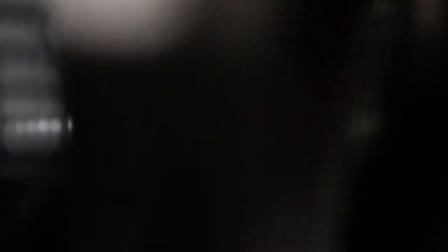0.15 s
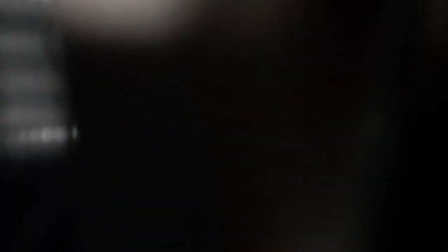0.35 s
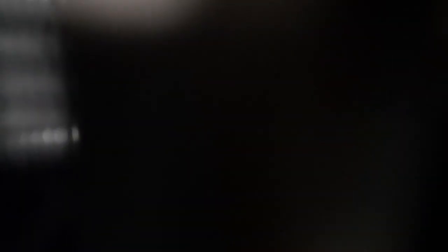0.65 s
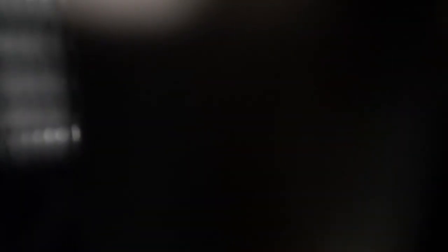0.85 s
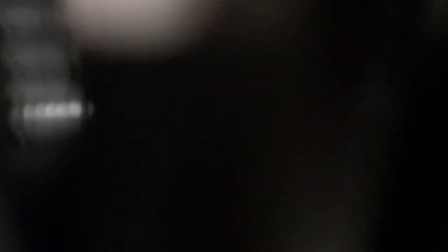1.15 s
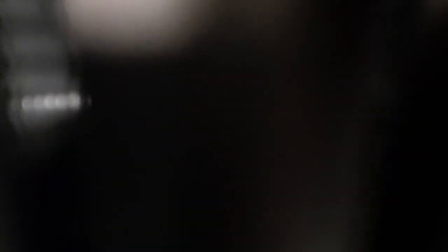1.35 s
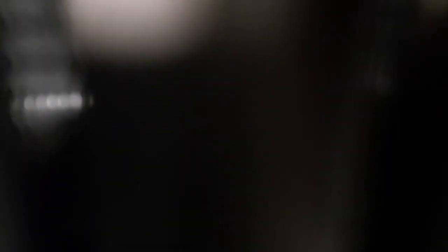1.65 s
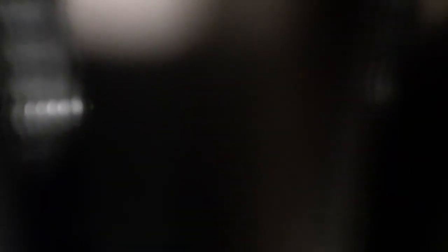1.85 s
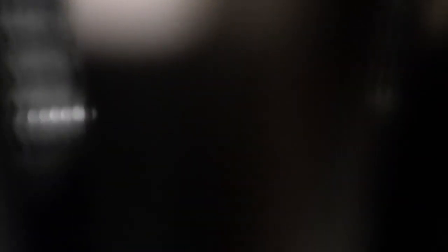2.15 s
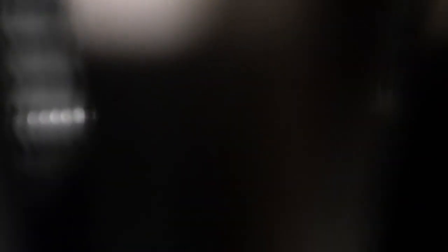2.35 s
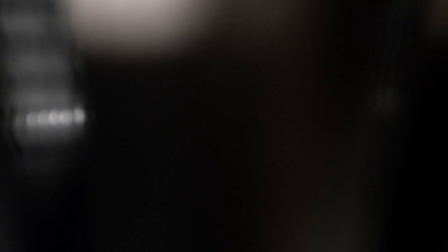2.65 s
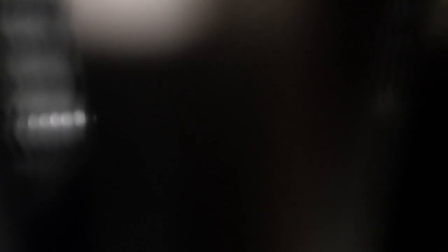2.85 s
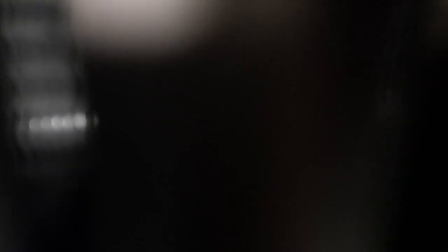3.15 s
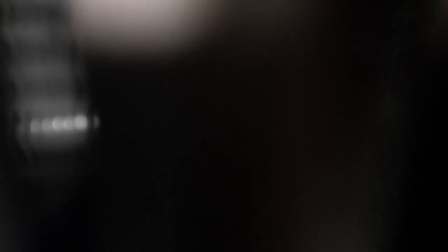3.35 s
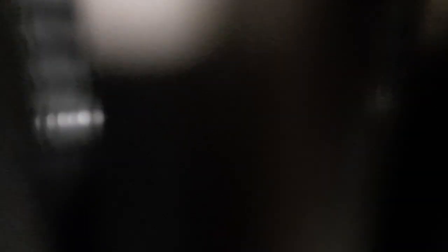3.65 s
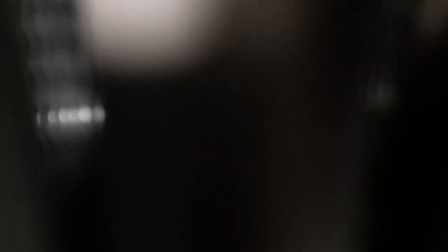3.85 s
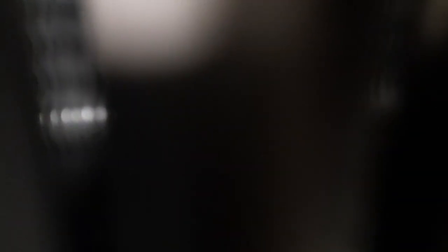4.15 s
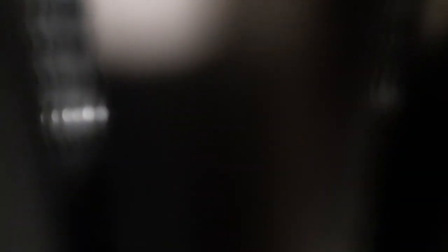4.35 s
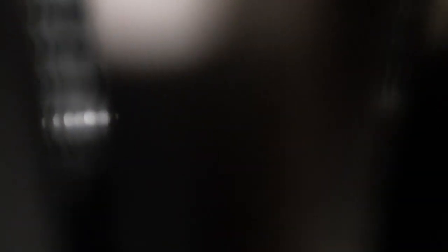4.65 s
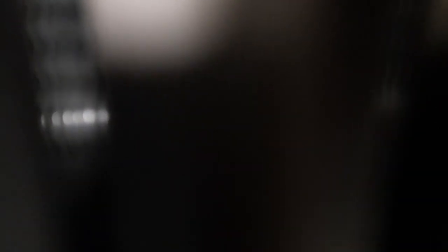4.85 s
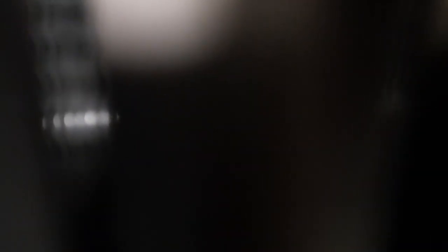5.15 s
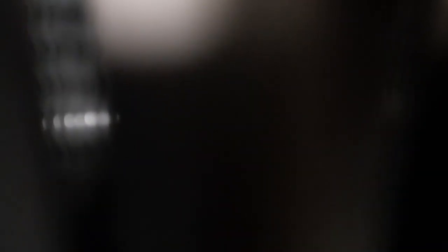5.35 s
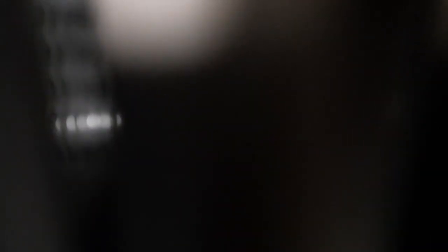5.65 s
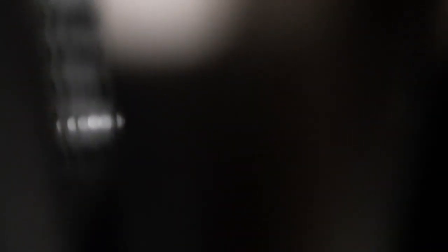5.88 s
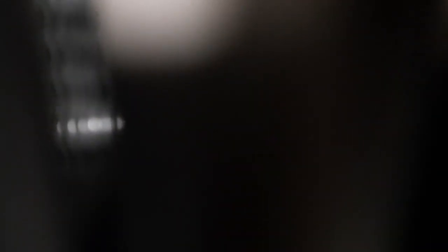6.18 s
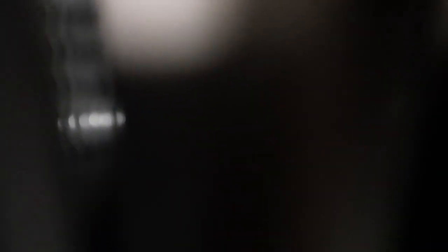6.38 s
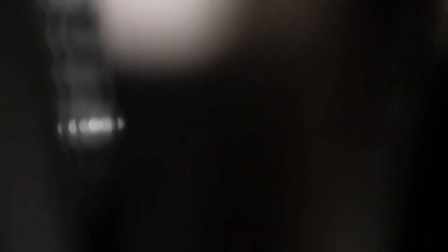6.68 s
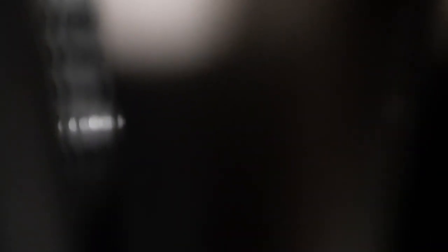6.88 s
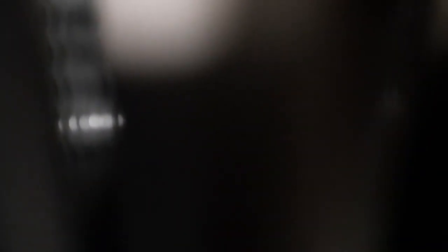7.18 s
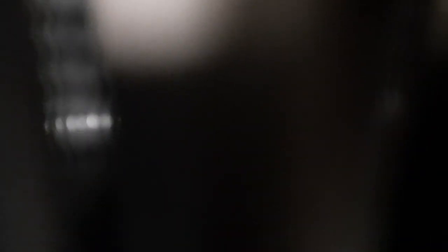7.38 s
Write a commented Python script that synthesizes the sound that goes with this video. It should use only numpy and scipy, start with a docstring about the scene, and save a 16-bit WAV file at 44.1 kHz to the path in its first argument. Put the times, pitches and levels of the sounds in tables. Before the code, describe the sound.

A window air conditioner is heard close up in a garage, slightly to the left. It opens with a faint low hum, soft gurgling and a thin hiss. At about 0.5 seconds the switch snaps off with one loud clunk and a quick, smaller rebound. The sheet-metal case rings with a low, hollow tone, and this dies away with a short room echo by about 1 second. Everything afterwards is much quieter. The rotor throbs low and unevenly, swelling slightly near 2 seconds, fading from about 5 to 7 seconds and returning a little at the end. Refrigerant gurgles in the coil and hisses through the tubes throughout, with tiny high spits at irregular moments, clearest near 2.6, 4.2 and 5.1 seconds. The flow eases slightly after 6.4 seconds and is still going at about 7.5 seconds.

```python
"""One clunk switches off a window air conditioner in a garage and rings its sheet-metal case.
A slow rotor throbs on and fades, its low shaft orders beating together. Refrigerant keeps gurgling
in the coil and hissing through the tubes, with small spits as bubbles pass the capillary.
The microphone is close, the unit a little to its left."""
import sys
import numpy as np
from scipy import signal
from scipy.fft import rfft, irfft
from scipy.io import wavfile

SR = 44100
rng = np.random.default_rng(int(sys.argv[2]) if len(sys.argv) > 2 else 0)


def dump_mix(stems):
    """Bounce the given channels to the path in sys.argv[1] as a 16-bit WAV at rate SR."""
    frames = np.atleast_2d(stems).T  # one column per channel
    limited = np.clip(frames, -1, 1)  # hard clip at full scale
    pcm = np.round(limited * 32767).astype(np.int16)
    wavfile.write(sys.argv[1], SR, pcm)


N = 331632
TIME_S, FREQ_HZ = np.arange(N) / SR, np.fft.rfftfreq(N, 1 / SR)


def amp(db):
    """Decibels to gain."""
    return 10 ** (np.asarray(db) / 20)


def unit_rms(x):
    """Scale to rms 1."""
    return x / np.sqrt(np.mean(x ** 2) + 1e-30)


def at_freq(curve, hz=FREQ_HZ):
    """Interpolate a curve on a log-frequency axis."""
    knots_hz, values = np.transpose(curve)
    return np.interp(np.log(hz + 1), np.log(knots_hz + 1), values)


def at_time(rows, column):
    """Interpolate one column at every sample."""
    rows = np.array(rows)
    return np.interp(TIME_S, rows[:, 0], rows[:, column])


def add(mix, start_s, sound):
    """Mix in a stereo sound."""
    part = mix[:, max(round(start_s * SR), 0):][:, :sound.shape[1]]
    part += sound[:, :part.shape[1]]


def peak(hz, centre_hz, width_hz):
    """Gain of a steep-skirted resonance."""
    return 1 / (1 + (2 * (hz - centre_hz) / width_hz) ** 2)


def response(modes, bed):
    """Gain of resonances on a smooth bed, summed in power."""
    power = sum((amp(db) * peak(FREQ_HZ, hz, width_hz)) ** 2 for hz, width_hz, db in modes)
    return np.sqrt(amp(at_freq(bed)) ** 2 + power)


def wander(rate_hz):
    """Random drift of rms 1, up to about rate_hz."""
    t = np.arange(0, N / SR + 1, 1 / 500)
    hz = np.fft.rfftfreq(len(t), t[1])
    lowpass = (hz > 0) / (1 + (hz / rate_hz) ** 2)
    drift = irfft(rfft(rng.standard_normal(len(t))) * lowpass, len(t))
    return np.interp(TIME_S, t, unit_rms(drift))


def burst(spectrum, t60_curve):
    """1 s of coloured stereo noise, each band with its own decay."""
    hz, t, bands = signal.stft(rng.standard_normal((2, SR)), SR, nperseg=512)
    bands = bands * amp(at_freq(spectrum, hz))[:, None]
    decay = amp(-60 * t / at_freq(t60_curve, hz)[:, None])
    steady = signal.istft(bands, SR)[1]
    dying = signal.istft(bands * decay, SR)[1]
    return dying[:, :SR] / steady.std()


def radiate(drive, colour):
    """Colour two noise streams and spread them in stereo: alike in the bass, diffuse above."""
    # left-right likeness: freq_hz, correlation
    likeness = [(40, 1), (130, 0.94), (230, 0.52), (290, .97), (390, 0.94), (540, 0.45), (650, 0.015),
                (1400, 0.11), (3000, 0.002), (15000, 0)]
    # left over right: freq_hz, difference_db
    balance = [(60, -18), (120, 12.5), (190, 2.5), (330, 0.5), (380, -0.5), (460, 12.5), (600, 6.5),
               (850, 6.5), (1200, 0.5), (1500, 3), (2500, 0.5), (6500, 0), (8500, 5.5), (14000, 5.5)]
    common, diffuse = rfft(drive)
    correlation = np.clip(at_freq(likeness), -1, 1)
    lean_db = at_freq(balance) / 2
    left = common * amp(lean_db)
    right = (correlation * common + np.sqrt(1 - correlation ** 2) * diffuse) * amp(-lean_db)
    return unit_rms(irfft(np.array([left, right]) * colour, N))


def rotor(shaft_hz=14.32, speed_waver=0.004, flutter=0.62):
    """Low orders of a slightly unsteady shaft beat into a throb."""
    # shaft harmonics: order, gain_db
    orders = [(3, -16), (4, 1), (5, -0.5), (6, -8), (7, -1), (8, -2.5), (9, -4), (13, -15.5)]
    # throb envelope: time_s, gain_db
    throb = [(0.0, -37), (0.33, -46), (0.42, -44), (0.46, -31), (0.48, -29), (0.58, -35), (0.65, -33),
             (0.73, -45), (1.21, -42), (1.4, -42), (1.63, -42), (1.95, -33.5), (2.07, -41.5), (2.16, -40.5),
             (2.28, -43), (2.32, -47), (2.45, -44), (2.49, -44.5), (2.79, -36.5), (2.83, -41),
             (3.08, -40.5), (3.14, -45), (3.35, -38), (3.39, -42.5), (3.64, -38.5), (3.71, -45),
             (4.36, -38), (4.52, -44.5), (4.61, -43), (4.69, -46), (4.84, -40), (4.88, -47), (5.13, -47.5),
             (5.36, -44), (5.42, -50), (5.49, -44), (5.72, -45), (6.01, -57.5), (6.36, -52), (6.41, -54.5),
             (6.62, -49.5), (6.7, -66), (6.87, -49), (7.2, -48), (7.31, -44), (7.41, -46), (7.46, -41),
             (7.52, -47)]
    turns = np.cumsum(shaft_hz * (1 + speed_waver * wander(rate_hz=2.46))) / SR
    hum = 0
    for order, db in orders:
        phase = 2 * np.pi * (order * turns + rng.random())
        in_phase = (1 + flutter * wander(rate_hz=2.8)) * np.cos(phase)
        quadrature = flutter * wander(rate_hz=1.8) * np.sin(phase)
        hum = hum + amp(db) * (in_phase + quadrature)
    envelope = [row for row in throb if not 0.36 < row[0] < 0.68]  # stays low through the clunk
    return amp(at_time(envelope, 1) - 1) * unit_rms(hum)


def bubbling(pops_per_s, spread_db, pop_share):
    """Two independent streams of turbulence with bursting bubbles."""
    onsets = rng.random(N) < pops_per_s / SR
    strength = amp(spread_db * np.minimum(rng.exponential(1, N), 4))
    turbulence = rng.standard_normal((2, N))
    pops = unit_rms(onsets * strength * rng.standard_normal((2, N)))
    return np.sqrt(1 - pop_share) * turbulence + np.sqrt(pop_share) * pops


def refrigerant():
    """Bubbly flow excites the coil and case hollows, thin tubes and capillary jet; all surge together."""
    # flow envelopes: time_s, gurgle_db, tubes_db, jet_db
    flow = [
        (0, -34, -54, -51.5), (0.044, -37.5, -56.5, -59), (0.112, -40.5, -61, -61.5),
        (0.16, -35, -58, -60), (0.262, -41, -54, -57), (0.27, -41, -60, -57.5),
        (0.384, -38, -57.5, -57.5), (0.44, -35, -56, -54), (0.66, -41, -57.5, -61),
        (0.85, -41.5, -60.5, -62), (0.87, -42.5, -58, -64.5), (0.93, -43, -61, -63),
        (0.98, -36.5, -59, -64), (1.04, -41.5, -61, -59.5), (1.06, -40.5, -54.5, -63),
        (1.12, -39, -60.5, -61), (1.18, -41, -55, -58.5), (1.19, -41, -63, -61),
        (1.21, -39.5, -58.5, -62), (1.67, -41, -58.5, -62), (1.77, -41, -56.5, -64),
        (1.8, -39.5, -59, -63), (1.92, -38, -54.5, -60.5), (2, -41.5, -54, -61), (2.03, -40, -58.5, -63),
        (2.11, -43.5, -58, -62), (2.15, -39.5, -59.5, -62.5), (2.38, -39, -55.5, -61),
        (2.42, -40, -60.5, -61), (2.74, -39, -55.5, -60.5), (2.86, -43, -58, -63), (2.91, -39, -66, -61),
        (2.97, -39.5, -60, -62), (2.99, -42, -51, -62), (3.03, -39, -60, -61), (3.12, -39, -55, -60),
        (3.18, -38, -55.5, -61.5), (3.33, -40, -61, -60.5), (3.39, -38, -54, -62),
        (3.43, -41.5, -57.5, -63), (3.49, -37.5, -51, -60), (3.52, -42, -60, -62), (3.7, -37, -58.5, -62),
        (3.72, -41.5, -61.5, -63), (3.85, -38.5, -53.5, -61.5), (3.89, -37, -57, -61.5),
        (3.93, -42.5, -58, -64), (4.02, -39, -54.5, -61), (4.12, -42, -59.5, -63.5),
        (4.23, -37.5, -59.5, -59), (4.25, -40, -48.5, -59), (4.29, -41, -60, -58), (4.33, -39, -51, -64),
        (4.35, -37.5, -59, -61), (4.42, -41, -56, -61.5), (4.75, -40, -59.5, -63),
        (4.84, -42.5, -59, -61.5), (4.88, -45, -60, -61.5), (4.92, -39.5, -57, -62.5),
        (4.98, -43, -57, -62), (5.3, -40, -59, -64), (5.34, -39, -56.5, -61), (5.47, -40, -58.5, -63),
        (5.65, -43, -58.5, -63), (5.84, -39.5, -58, -64), (5.9, -41.5, -57, -62),
        (6.08, -40.5, -60, -63.5), (6.28, -43, -60.5, -62.5), (6.33, -38, -61, -59),
        (6.39, -47.5, -56, -61.5), (6.45, -49, -65, -69), (6.54, -42, -59.5, -64),
        (6.74, -43.5, -61, -66), (6.83, -41.5, -61.5, -64.5), (6.87, -49, -66, -68.5),
        (6.98, -45, -57.5, -64), (7.27, -46.5, -63, -67.5), (7.29, -42.5, -59, -64.5),
        (7.37, -41.5, -61.5, -66.5), (7.52, -41.5, -55, -63.5)]
    # resonances: centre_hz, width_hz, gain_db
    hollow_modes = [(187, 34, -11.5), (231.6, 25, -12.5), (293.8, 23.5, 1), (326.3, 35, 1), (375, 52, -1.5),
                    (428, 36, -18), (479, 47, -21.5), (555.6, 50.4, -12), (674.5, 106, -17.5),
                    (845.6, 64, -14.5)]
    tube_modes = [(1010, 61, -8), (1280, 140, -10), (1463.6, 94, 3.5), (1673, 55, -3), (2224, 84, -9.5)]
    jet_modes = [(2926, 216, 4), (3360, 300, 1.5), (3940, 220, -1.5), (4446, 320, 4), (5396, 195, 4),
                 (5810, 200, 0.5), (6254, 260, 2.5), (7600, 340, -11.5), (11300, 530, -6.5),
                 (13200, 500, -11)]
    # broadband beds under them: freq_hz, gain_db
    hollow_bed = [(30, -36), (100, -10.5), (250, -33), (600, -27.5), (900, -29), (1200, -33.5), (2000, -60)]
    tube_bed = [(500, -25), (1100, -17), (1800, -16.5), (2400, -34.5), (4000, -35)]
    jet_bed = [(800, -22), (2000, -4), (2550, -6), (3600, -4.5), (5000, -9.5), (6700, -6), (8000, -7),
               (10500, -10), (12000, -8.5), (15500, -10)]
    surge = wander(rate_hz=19)
    hollow_drive = bubbling(pops_per_s=120, spread_db=0, pop_share=0.33) * amp(0.86 * surge)
    tube_drive = bubbling(pops_per_s=200, spread_db=2, pop_share=0.24) * amp(0.93 * surge)
    jet_drive = bubbling(pops_per_s=1500, spread_db=3, pop_share=0.17)
    jet_drive *= amp(0.68 * surge + 0.91 * wander(rate_hz=55))
    gurgle = radiate(hollow_drive, response(hollow_modes, hollow_bed)) * amp(at_time(flow, 1) + 0.36)
    tubes = radiate(tube_drive, response(tube_modes, tube_bed)) * amp(at_time(flow, 2) + 3)
    jet = radiate(jet_drive, response(jet_modes, jet_bed)) * amp(at_time(flow, 3) + 8.5)
    return gurgle + tubes + jet


def spits(rise_share=0.34, size=8192):
    """Each bubble through the capillary is a pitched puff of hiss that swells fast and dies."""
    # bubbles: start_s, gain_db, pitch_hz, width_hz, length_s
    bubbles = [(0.0, -51.5, 5000, 2500, 0.044), (0.716, -56.5, 5480, 500, 0.085),
               (0.819, -54.5, 5000, 5000, .025), (1.054, -52, 4550, 500, 0.023),
               (1.054, -55, 5840, 1200, .035), (1.362, -56, 5450, 600, 0.032),
               (1.568, -55.5, 5400, 600, .06), (1.913, -57, 4480, 500, 0.022),
               (1.972, -55, 4230, 900, .025), (1.966, -54, 5860, 1400, 0.053),
               (2.42, -53, 4500, 350, 0.021), (2.463, -54, 4000, 400, 0.025), (2.485, -55, 5360, 700, .015),
               (2.646, -47, 5740, 1700, 0.016), (2.723, -57, 4800, 900, .015),
               (3.13, -54.5, 5700, 1400, .04), (3.246, -55, 5540, 700, .018), (3.284, -53, 5300, 900, 0.06),
               (3.476, -59, 5400, 400, .06), (3.764, -54.5, 5500, 3000, 0.018),
               (4.19, -51.5, 4420, 900, 0.032), (4.24, -49, 4900, 3000, 0.028),
               (4.275, -53, 7750, 3500, 0.028), (4.829, -51, 8140, 600, .016),
               (4.876, -52, 5360, 1700, .03), (5.057, -46.5, 5600, 1490, 0.027),
               (5.067, -56, 4020, 500, .025), (5.54, -56, 6200, 1200, .022),
               (5.906, -58, 4800, 3500, 0.044), (6.331, -57.5, 5000, 7000, 0.072),
               (6.524, -59, 6030, 1500, 0.035), (6.575, -63, 5450, 500, 0.054)]
    out = np.zeros((2, N))
    t, hz = np.arange(size) / SR, np.fft.rfftfreq(size, 1 / SR)
    for start_s, db, pitch_hz, width_hz, length_s in bubbles:
        noise = rfft(rng.standard_normal((2, size)))
        puff = unit_rms(irfft(noise * peak(hz, pitch_hz, width_hz)))
        age = t / (length_s * rise_share)  # 1 at the crest
        add(out, start_s, amp(db + 2) * puff * age * np.exp(1 - age))
    return out * amp([[1], [-1]])


def clunk(crack_decay_s=0.0078, ring_delay_s=0.002935, ring_rise_s=0.0023, room_rise_s=0.0049):
    """The switch snaps and rebounds: a crack, then the panels ring and the garage reverberates."""
    # switch blows on the case: start_s, crack_db, ring_db
    blows = [(0.4626, -10.5, -11), (0.486, -24, -22.5), (0.511, -28, -42)]
    # panel modes: freq_hz, gain_db, t60_s
    case_modes = [(124.1, -9, 0.47), (160, -10, 0.22), (213.4, -8, 0.17), (248.4, -4, 0.27),
                  (290, 2.5, 0.25), (334, -10.5, 0.29), (417, -15, 0.44), (575, -10.5, 0.21),
                  (665, -17, .25), (837, -14, 0.22), (1012, -27, 0.28), (1403, -17.5, 0.18),
                  (2290, -37, 0.33), (2620, -19, 0.24), (2762, -24, .2)]
    # crack and reverb spectra: freq_hz, density_db
    crack_spectrum = [(88, -28), (150, 6.5), (346, -13.5), (1090, -32), (1940, -14), (3410, -32),
                      (3760, -19.5), (5440, -27), (7710, -31), (9180, -38), (15500, -44)]
    garage_spectrum = [(35, -49), (60, -24), (123, -7), (152, -16), (291, -1.5), (368, -31), (413, -13),
                       (1170, -21.5), (1380, -24), (2590, -23.5), (7540, -46), (9080, -66), (15500, -54)]
    # reverb decay: freq_hz, t60_s
    garage_t60 = [(100, .55), (300, 0.38), (1000, .3), (2700, .31), (6000, 0.21), (14000, .3)]
    crack_t60 = [(200, 3), (4000, 0.92), (12000, 0.1)]  # damping on top of crack_decay_s
    out, t = np.zeros((2, N)), np.arange(SR) / SR
    ring = sum(amp(db - 60 * t / t60_s) * np.sin(2 * np.pi * hz * t) for hz, db, t60_s in case_modes)
    ring *= 1 - np.exp(-t / ring_rise_s)
    for start_s, crack_db, ring_db in blows:
        crack = burst(crack_spectrum, crack_t60) * np.exp(-t / crack_decay_s)
        add(out, start_s, amp(crack_db) * crack * amp([[0], [-7]]))
        add(out, start_s + ring_delay_s, amp(ring_db) * ring * amp([[0], [-12]]))
    reverb = burst(garage_spectrum, garage_t60) * (1 - np.exp(-t / room_rise_s))
    add(out, blows[0][0], reverb * amp([[-20], [-23]]))
    return out


def scene():
    """The clunk over the rotor and the refrigerant."""
    return clunk() + rotor() + refrigerant() + spits()


def record(dry):
    """A treble dip at each microphone port, then a 15.8 kHz low-pass."""
    # port dips, left then right: centre_hz, width_hz, depth_db
    notches = [(9030, 810, 11.5), (9700, 1340, 19)]
    ports_db = [-depth_db * np.exp(-((FREQ_HZ - hz) / width_hz) ** 2)
                for hz, width_hz, depth_db in notches]
    heard = irfft(rfft(dry) * amp(ports_db), N)
    lowpass = signal.firwin(1023, 15800, window=("kaiser", 9), fs=SR)
    return signal.oaconvolve(heard, lowpass[None], "same")


dry = scene()
out = record(dry)
dump_mix(out)
```